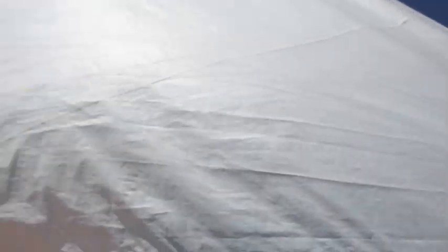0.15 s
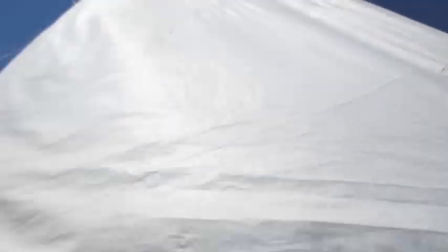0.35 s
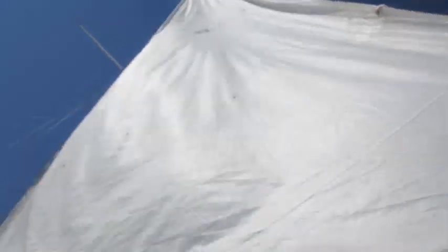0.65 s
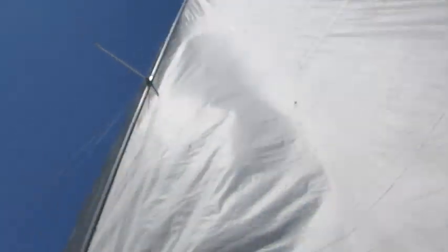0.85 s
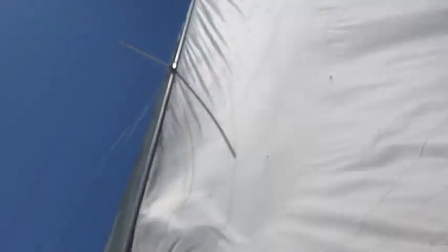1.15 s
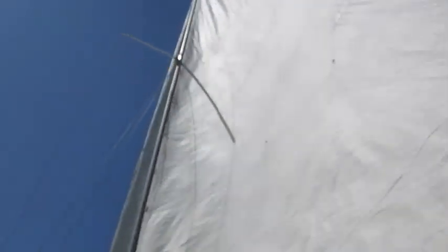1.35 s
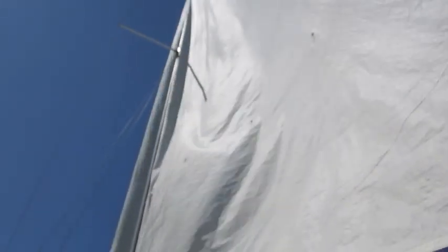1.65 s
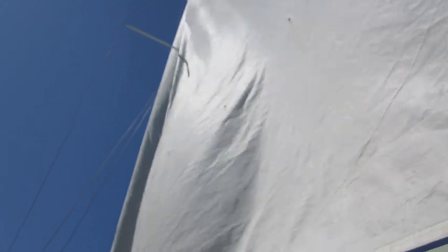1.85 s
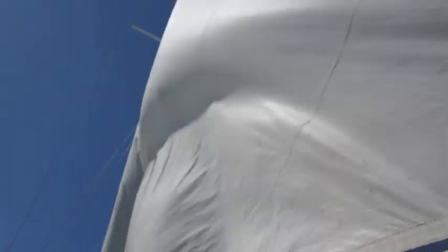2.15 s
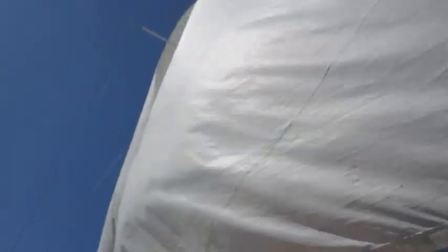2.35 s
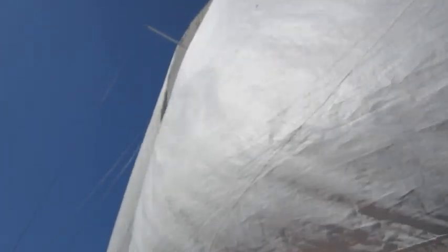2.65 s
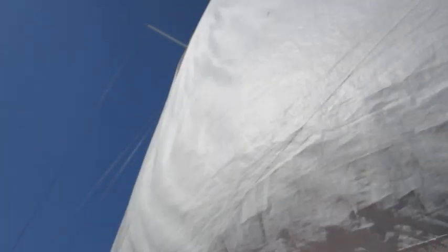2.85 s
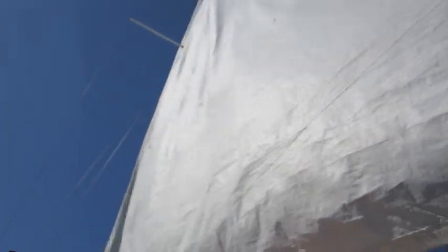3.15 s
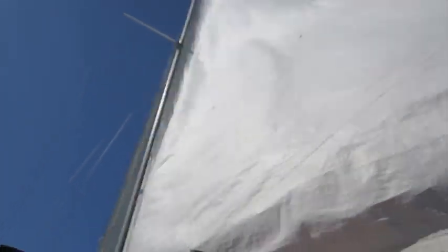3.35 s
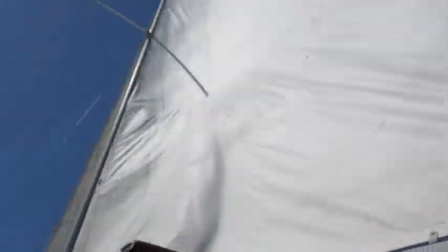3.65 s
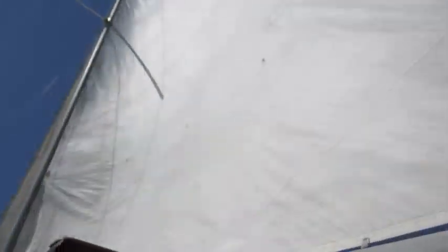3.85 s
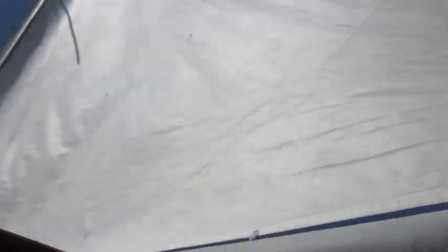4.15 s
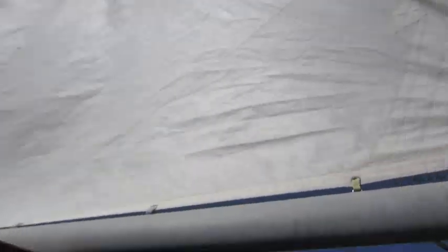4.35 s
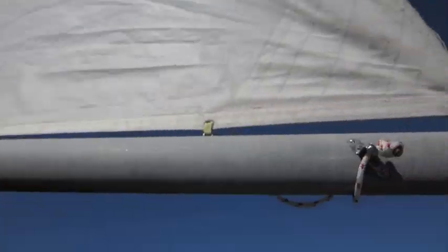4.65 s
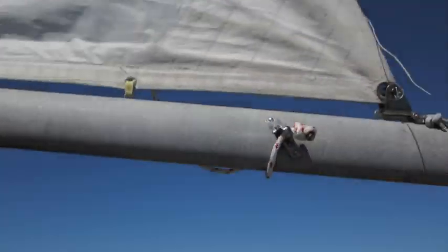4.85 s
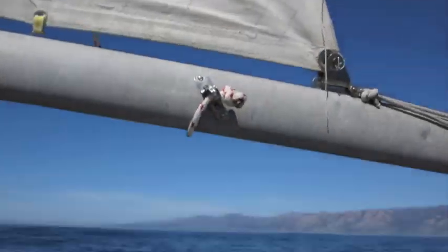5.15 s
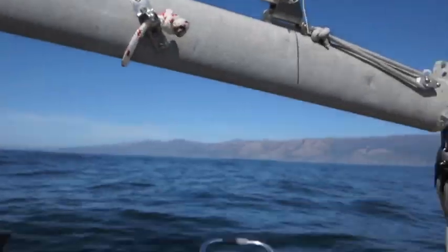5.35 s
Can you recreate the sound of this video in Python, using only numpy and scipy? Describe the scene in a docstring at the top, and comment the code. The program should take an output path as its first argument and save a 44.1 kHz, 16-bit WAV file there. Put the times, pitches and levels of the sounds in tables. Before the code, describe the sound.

Outdoors on a small boat, a stiff slack sail flaps close by. Crackling snaps and rustling build to busy surges around one and two seconds, with wind rumbling and thumping on the microphone. After a lull of about a second the cloth snaps again near four seconds, calms, a small plop of water sounds, and a sharp last flurry ends it. Very faint sea wash lies below.

```python
"""A slack sail flaps above a small boat rocking in light air, while the sea, made of noise, washes faintly below.
For two and a half seconds creases in the stiff cloth snap open as crackling bursts over a rustle of tiny clicks.
Swings of the sail blow eddies across the microphone: they rumble as filtered clicks and thump as short waves.
After a lull of about a second the sail flaps again up to about four seconds and calms; near five seconds water
plops, made as one more short wave, and a last flurry ends it. Spar and fittings ring faintly with the snaps, and
now and then cloth slides on cloth with an even hiss."""
import sys
import numpy as np
from scipy import signal
from scipy.io import wavfile
from scipy.ndimage import uniform_filter1d

SR = 44100
rng = np.random.default_rng(int(sys.argv[2]) if len(sys.argv) > 2 else 0)


def materialize(psi):
    """Save the field psi as 16-bit PCM at rate SR to the path in sys.argv[1].

    A 1-D psi becomes a single channel; in a 2-D psi each row is a channel.
    """
    bounded = np.clip(np.atleast_2d(psi).T, -1, 1)
    quanta = np.round(bounded * 32767).astype(np.int16)
    wavfile.write(sys.argv[1], SR, quanta)


N = 242991  # length in samples


def from_db(db):
    """Turn decibels into a gain."""
    return 10 ** (np.asarray(db) / 20)


def rms_one(x):
    """Scale a sound to an average (rms) level of 1."""
    return x / np.sqrt(np.mean(x ** 2) + 1e-20)


def at_hz(points, hz):
    """Read a spectrum table at one pitch, with straight lines between points on a log-frequency axis."""
    table_hz, table_db = np.array(points).T
    return np.interp(np.log(hz), np.log(table_hz), table_db)


def drift(rate):
    """Slow random wandering of spread 1: noise smoothed by a filter, faster for a higher rate in Hz."""
    step = 20  # samples from one computed point to the next
    pole = np.exp(-2 * np.pi * step * rate / SR)
    noise = rng.standard_normal(N // step + 2002)
    slow = signal.lfilter([1], [1, -2 * pole, pole ** 2], noise)[2000:]  # skip the filter's start
    return np.interp(np.arange(N) / step, np.arange(len(slow)), rms_one(slow))


def grains(per_s, spread_db):
    """Random clicks of uneven size and sign, at average level 1."""
    size_db = spread_db * np.minimum(rng.exponential(1, N), 4)
    sizes = from_db(size_db) * rng.choice([-1, 1], N)
    happens = rng.random(N) < per_s / SR
    return rms_one(sizes * happens + 1e-9)


def bands(sources, low_hz, high_hz, count):
    """Cut sound into neighbouring bands, taking the sources in turn; gives (centre Hz, band)."""
    edges = np.geomspace(low_hz, high_hz, count + 1)
    for k, (low, high) in enumerate(zip(edges, edges[1:])):
        sos = signal.butter(2, [low, high], "band", fs=SR, output="sos")
        yield np.sqrt(low * high), signal.sosfilt(sos, sources[k % len(sources)])


def wash(spectrum, sources, low_hz, patchy_db, rate):
    """Coloured noise whose bands waver partly together, at average level 1."""
    together = drift(rate)
    total = 0
    for hz, band in bands(sources, low_hz, 17200, count=16):
        waver_db = patchy_db * (together + 1.6 * drift(rate))
        total = total + from_db(at_hz(spectrum, hz) + waver_db) * band
    return rms_one(total)


# Colour of the sea. Each row: pitch in Hz, relative level in dB per Hz.
SEA_COLOUR = [(15, -34), (30, 12), (120, -2.5), (350, 5.5), (600, -25.5), (1100, -8), (1600, -27),
              (4000, -30), (16000, -54)]
SEA_DB = -50


def sea():
    """Faint wash of water: steady noise in the sea's colour, swelling slowly."""
    noise = rng.standard_normal((2, N))
    return from_db(SEA_DB) * wash(SEA_COLOUR, noise, 30, patchy_db=3.5, rate=1.3)


# Air shoved by the moving cloth is bright, a breeze past still cloth is dull:
# tilt in dB per octave at -40 dB rustle and -30 dB rumble, and its change per dB of each.
WIND_TILT_DB, TILT_PER_RUSTLE, TILT_PER_RUMBLE = -5, 0.48, -0.32
WIND_KNEE_HZ, KNEE_DB = 654, -5.5  # above the knee the level falls by this much more per octave


def wind(rumble_db, rustle_db):
    """Eddies are lumps of air shared by all low bands; livelier cloth makes them brighter."""
    tilt_db = WIND_TILT_DB + TILT_PER_RUSTLE * (rustle_db + 40) + TILT_PER_RUMBLE * (rumble_db + 30)
    eddies = grains(600, 2.05)
    # even out the level over 50 ms: the flow never stalls for long
    eddies = eddies / np.sqrt(uniform_filter1d(eddies ** 2, size=SR // 20))
    gusty = eddies * from_db(2.96 * drift(13))
    rumble, bass = 0, 0
    for hz, band in bands([gusty], 33.0, 1470, count=9):
        slope_db = tilt_db * max(np.log2(hz / 110), 0) - 0.13 * max(np.log2(110 / hz), 0)
        slope_db = slope_db + KNEE_DB * max(np.log2(hz / WIND_KNEE_HZ), 0)
        rumble = rumble + from_db(slope_db + 1.4 * drift(9)) * band
        bass = bass + band * (hz < 200)
    rumble = signal.sosfilt(signal.butter(2, 1150, fs=SR, output="sos"), rumble)
    return from_db(rumble_db) * rumble / np.std(bass)  # the bass sets the level


# Low thumps: eddies on the microphone, and one water plop at 4.965 s.
# Each row: start in seconds, level in dB, pitch in Hz.
LOW_THUMPS = [(0.129, -23.5, 410), (0.96, -20.5, 122), (1.057, -14.5, 127), (1.095, -12, 178),
              (1.227, -10.5, 179), (1.27, -3, 274), (1.328, -10, 148), (1.437, -13, 117),
              (1.495, -16.5, 275), (1.577, -14.5, 155), (1.6, -19.5, 139), (1.639, -15, 210),
              (1.666, -11, 123), (1.689, -19, 119), (1.762, -18.5, 120), (1.783, -17, 233),
              (1.874, -14, 126), (1.9, -14.5, 135), (2.02, -25.5, 258), (2.098, -24.5, 163),
              (2.189, -25, 250), (2.245, -11.5, 242), (2.946, -35, 150.4), (3.027, -28, 131),
              (3.062, -37, 199), (3.097, -19, 220), (3.125, -27, 150), (3.869, -9.5, 332),
              (3.876, -10.5, 294), (3.953, -6, 390), (4.117, -22.5, 120), (4.179, -25, 124),
              (4.912, -22.5, 287), (4.965, -27.5, 371), (5.278, -10.5, 333), (5.309, -4.5, 825),
              (5.315, -7, 800)]
THUMP_CYCLES, CYCLES_GROW = 0.451, .3  # bell width in cycles at 125 Hz; power of pitch by which it grows


def thumps():
    """A strong eddy, or the plop, is one short swing of pressure under a bell, steeper at its crest."""
    out = np.zeros(N + SR // 4)
    phases = rng.uniform(0, 2 * np.pi, len(LOW_THUMPS))
    for (start_s, db, hz), phase in zip(LOW_THUMPS, phases):
        width = THUMP_CYCLES * (hz / 125) ** CYCLES_GROW
        cycles = np.arange(round(4 * width * SR / hz)) * hz / SR - 2 * width  # zero at the crest
        swing = np.exp(-(cycles / width) ** 2) * np.sin(2 * np.pi * cycles + phase)
        edge = .45 * np.exp(-(4 * cycles) ** 2) * np.sin(5 * np.pi * cycles + phase)
        i = round(start_s * SR)
        out[i:i + len(cycles)] += from_db(db) * (swing + edge)
    return out[:N]


# Faint ring of spar and fittings.
# Each row: pitch in Hz, typical level in dB relative to the snap, time in seconds to fade by 60 dB.
RIG_MODES = [(1010, -23, .1), (2800, -22, .11), (3400, -25, .1), (4010, -20, .11)]


def rig(spread_db):
    """Each listed snap jolts spar and fittings, and every mode rings with a strength of its own."""
    at = [round(row[0] * SR) for row in CREASE_SNAPS]
    snap_db = np.array(CREASE_SNAPS)[:, 1]
    strength = rng.standard_normal((len(CREASE_SNAPS), len(RIG_MODES)))
    out = 0
    for (hz, db, fade_s), own in zip(RIG_MODES, strength.T):
        jolts = np.full(N, 1e-18)
        jolts[at] = from_db(snap_db + db + spread_db * own)
        # a two-pole filter rings on after each jolt
        pole, turn = from_db(-60 / (fade_s * SR)), 2 * np.pi * hz / SR
        out = out + signal.lfilter([0, np.sin(turn)], [1, -2 * pole * np.cos(turn), pole ** 2], jolts)
    return out


# Colour of the rustling cloth. Each row: pitch in Hz, relative level in dB per Hz.
RUSTLE_COLOUR = [(290, -15), (500, 0.5), (1100, -3), (1500, -1.5), (3600, -7), (6700, -18.5), (11000, -19),
                 (16000, -47)]


def rustle(rustle_db):
    """Moving cloth gives countless tiny clicks, coloured and patchy, that follow the swings."""
    clicks = [grains(6000, 2.6), grains(6000, 3.4)]
    return from_db(rustle_db) * wash(RUSTLE_COLOUR, clicks, 426, patchy_db=2.0, rate=25.0)


# Cloth sliding on cloth. Each row: start in seconds, length in seconds, level in dB.
CLOTH_SLIDES = [(0.23, 0.12, -54), (3.385, 0.14, -49.5), (4.5, .3, -56), (4.825, 0.1, -57)]
SLIDE_EDGE_S = 0.025  # fade at each end


def slides():
    """Cloth sliding on cloth is a soft even hiss: noise in the cloth's colour, faded in and out."""
    t = np.arange(N) / SR
    shape = 0
    for start_s, length_s, db in CLOTH_SLIDES:
        to_nearest_end = np.minimum(t - start_s, start_s + length_s - t)
        shape = shape + from_db(db) * np.clip(to_nearest_end / SLIDE_EDGE_S, 0, 1)
    noise = rng.standard_normal((2, N))
    return shape * wash(CLOTH_COLOUR, noise, 900, patchy_db=1.0, rate=8.1)


SMALL_PER_S = 35
# least level above a rustle of -35 dB; average random extra on top; treble tilt per octave
SMALL_DB, SMALL_SPREAD_DB, SMALL_TILT_DB = 6, 3, -5.5
SMALL_FOLLOWS = 1.53  # dB of small creases per dB of rustle, about -35 dB


def small_creases(rustle_db):
    """Small creases give at random times, stronger where the cloth is busy; rows like CREASE_SNAPS."""
    draws = rng.random((round(SMALL_PER_S * N / SR), 2))
    at = (draws[:, 0] * N).astype(int)
    extra_db = -SMALL_SPREAD_DB * np.log(1 - draws[:, 1])
    db = -35 + SMALL_FOLLOWS * (rustle_db[at] + 35) + SMALL_DB + extra_db
    return [(i / SR, level, SMALL_TILT_DB) for i, level in zip(at, db)]


# Creases snapping open. Each row: start in seconds, level in dB, treble tilt in dB per octave.
CREASE_SNAPS = [(0.0629, -24.5, -1.5), (0.1141, -21.5, 0.5), (0.2165, -26.5, -5), (0.25, -21, -9.5),
                (0.2845, -23.5, -7.5), (0.333, -30.5, -1.5), (0.462, -13, -3.5), (0.5074, -15, -6),
                (0.6361, -12.5, -5), (0.7236, -33, -23), (0.7585, -22, -6.5), (0.8519, -21, -19),
                (0.894, -18.5, -18), (0.934, -24, -6.5), (0.956, -21.5, -5), (1.01, -18, -2),
                (1.0193, -15.5, -7), (1.0403, -15.5, -2), (1.084, -18, -1.5), (1.141, -11, 1),
                (1.215, -13, -6), (1.2569, -13.5, -4.5), (1.292, -17.5, 3), (1.323, -13.5, -12),
                (1.3558, -11, -7.5), (1.3739, -13.5, 1.5), (1.3995, -14, 1), (1.4511, -21, -1),
                (1.4868, -21, -2.5), (1.652, -21, -5), (1.7542, -23.5, -5.5), (1.932, -26.5, -15),
                (1.9955, -32, -8), (2.0737, -47.5, 9.5), (2.139, -15, -20), (2.164, -17, -6.5),
                (2.251, -6.5, -4.5), (2.3082, -11.5, -0.5), (2.3303, -13, 6), (2.3574, -6, -2),
                (2.3689, -10.5, 0.5), (2.4423, -26.5, -0.5), (2.5217, -28.5, -8), (2.791, -39.5, -3),
                (2.877, -44.5, -12.5), (2.986, -39, -40), (3.033, -45.5, -17), (3.05, -39.5, -19),
                (3.1337, -37, -9), (3.316, -42, -16), (3.4058, -25, -11.5), (3.4738, -17.5, -1.5),
                (3.525, -54, -41), (3.5685, -35, -43), (3.6134, -22, -4), (3.67, -31, 1), (3.7459, -36, 1),
                (3.824, -25.5, 4), (3.8938, -9.5, 1.5), (3.916, -13.5, 3.5), (3.9774, -13, -2.5),
                (4.008, -23, 5), (4.0542, -22.5, -8.5), (4.109, -27.5, -3), (4.163, -35.5, -4.5),
                (4.215, -37, -21), (4.2577, -38, -29), (4.4053, -29.5, -1), (4.447, -50, 9.5),
                (4.528, -34, 1), (4.6706, -24, -6), (4.745, -26.5, -5), (4.8665, -34.5, -2),
                (4.94, -28.5, -36), (5.119, -22, -6.5), (5.1267, -21.5, 0.5), (5.1829, -16, -3.5),
                (5.2063, -11, -9), (5.265, -38, -21), (5.284, -19, -51), (5.358, -16, -19),
                (5.367, -7.5, 2.5), (5.388, -18, 6.5), (5.4038, -10, -6.5), (5.4332, -25, -1)]
# Colour of the stiff cloth. Each row: pitch in Hz, relative level in dB per Hz.
CLOTH_COLOUR = [(290, -21), (500, -18), (1000, -7), (1400, -13), (2100, -4), (3000, -2), (4000, 2),
                (6500, -3.5), (11000, -11), (13500, -15.5), (16000, -36)]
SNAP_T60_S = 0.084  # time to fade by 60 dB, at 4 kHz and no tilt
BODY_SHARE = 0.15  # share of a snap's tilt that carries on below 3 kHz
BRIGHT_SHORTENS = 0.016  # a snap dies faster by about this share per dB per octave of tilt


def snaps(creases, rise_s, flutter_db):
    """Each crease is a crackling burst that starts almost at once; its treble dies first."""
    at = [round(row[0] * SR) for row in creases]
    t = np.arange(SR // 4) / SR
    colour = rng.standard_normal((len(creases), 22))  # every crease has a colour of its own
    crackle = [grains(7000, 3.3), grains(7000, 3.3)]
    # the fold gives with a short crack
    attack = (1 - np.exp(-t / rise_s)) * (1 + .9 * np.exp(-t / .002))
    flutter = from_db(flutter_db * drift(150))
    out, whole = 0, 0
    for k, (hz, band) in enumerate(bands(crackle, 411.6, 18860, count=22)):
        band = from_db(at_hz(CLOTH_COLOUR, hz)) * band
        shape = np.zeros(N + len(t))
        octaves = np.log2(hz / 3000) * (1 if hz > 3000 else BODY_SHARE)
        decay_db = -60 * t / SNAP_T60_S * (hz / 4000) ** 0.18
        for i, (_, db, tilt_db), own in zip(at, creases, colour[:, k]):
            level_db = db + tilt_db * octaves + 3.5 * own
            fade_db = decay_db * np.exp(BRIGHT_SHORTENS * tilt_db)
            shape[i:i + len(t)] += from_db(level_db + fade_db) * attack
        out = out + shape[:N] * band
        whole = whole + band
    # the near-highest peaks of the plain crackle set the level
    return out * flutter / np.percentile(abs(whole), 99)


# Swings of the sail, joined by straight lines.
# Each row: time in seconds, wind rumble level in dB, cloth rustle level in dB.
SAIL_SWINGS = [(0.0, -33, -51), (0.33, -38, -46.5), (0.47, -37, -49), (0.83, -45, -47.5), (0.98, -25, -42),
               (1.36, -17, -31.5), (1.46, -22, -41), (1.53, -28.5, -47.5), (1.671, -18.5, -51),
               (1.74, -35.5, -50.5), (1.83, -28, -55.5), (1.9, -20, -53), (1.95, -32, -44.5),
               (2.15, -35, -39.5), (2.3, -20.5, -30), (2.369, -26, -39.5), (2.499, -58, -61.5),
               (2.85, -87, -71.5), (3.102, -24.5, -61.5), (3.192, -50.5, -61), (3.55, -36.5, -51),
               (3.64, -34.5, -43), (3.8, -28, -36), (3.88, -17.5, -30.5), (4.0, -33, -45),
               (4.14, -30.5, -54), (4.28, -44, -57.5), (4.8, -70, -47.5), (5.159, -43, -48),
               (5.261, -21, -29), (5.349, -19, -30.5), (5.42, -40, -43.5), (5.51, -45, -48.5)]


def scene():
    """The swings drive wind, rustle and small creases; sea, thumps, rig, slides and snaps join them."""
    swing_s, *columns = np.transpose(SAIL_SWINGS)
    t = np.arange(N) / SR
    rumble_db, rustle_db = [np.interp(t, swing_s, column) for column in columns]
    low_sounds = wind(rumble_db, rustle_db) + thumps()
    creases = CREASE_SNAPS + small_creases(rustle_db)
    sail = rustle(rustle_db) + slides() + snaps(creases, rise_s=.0007, flutter_db=-0.5)
    return (sea() + low_sounds + rig(spread_db=4.5) + sail)[None]


CUTOFF_HZ = 16400


def record(dry):
    """The highest peaks are rounded, then the top of the treble is cut steeply."""
    rounded = .85 * np.tanh(dry / .85)
    return signal.sosfilt(signal.cheby2(14, 70, CUTOFF_HZ, fs=SR, output="sos"), rounded)


dry = scene()
out = record(dry)
materialize(out)
```